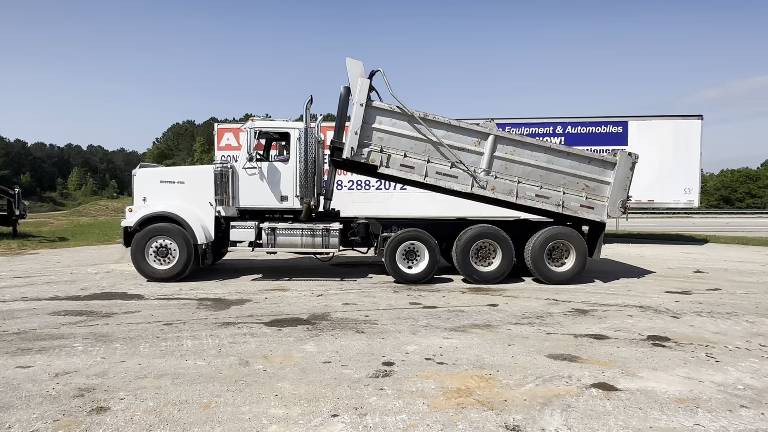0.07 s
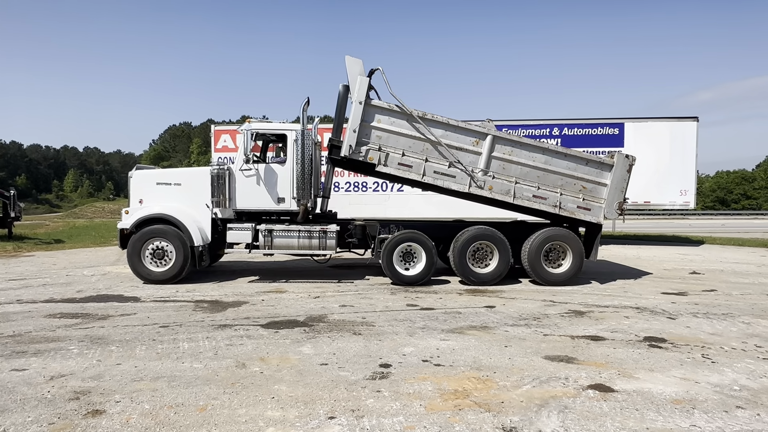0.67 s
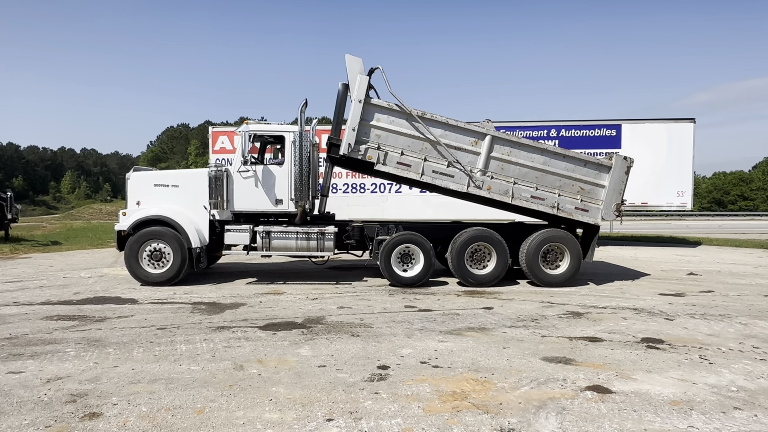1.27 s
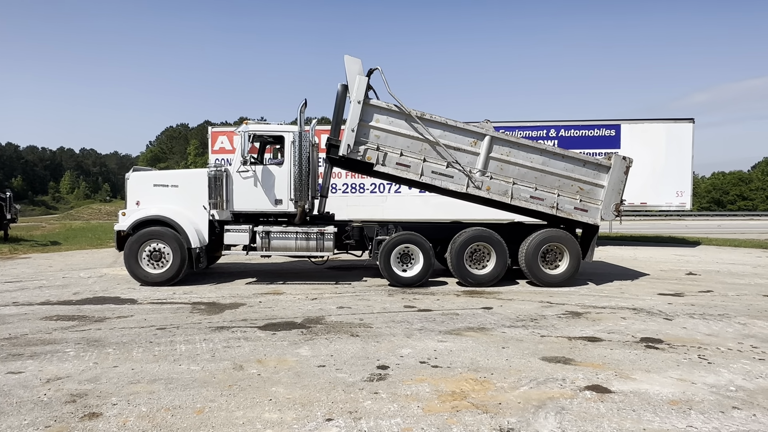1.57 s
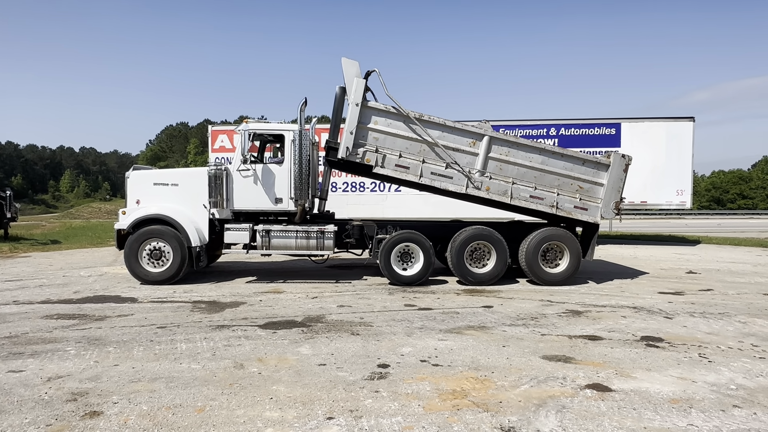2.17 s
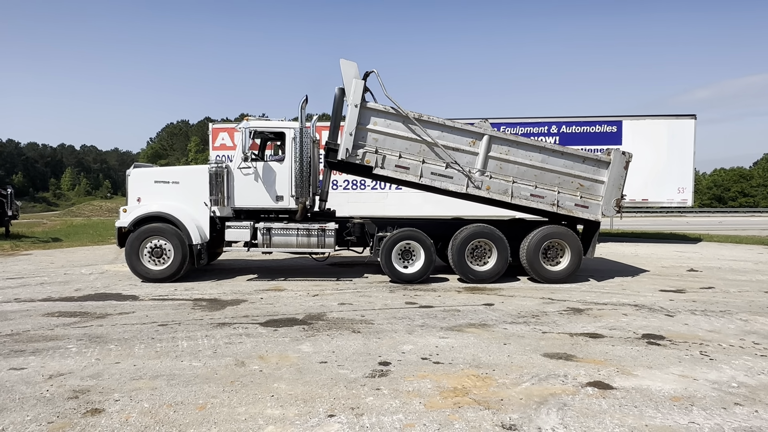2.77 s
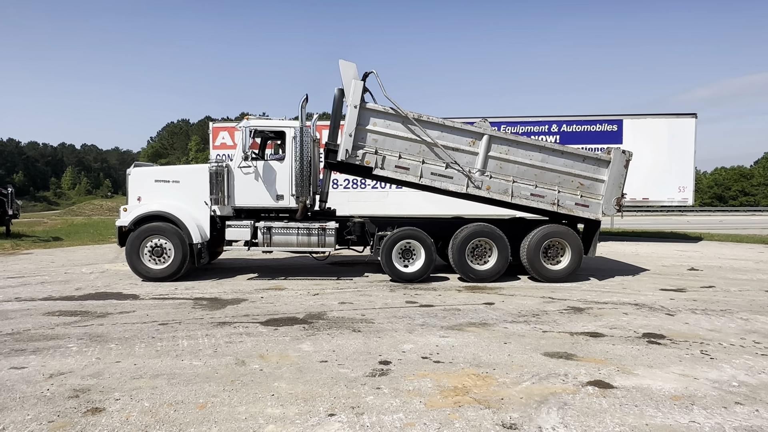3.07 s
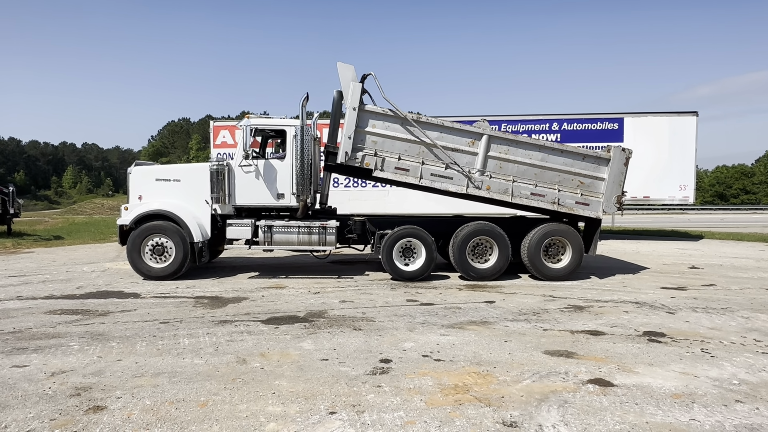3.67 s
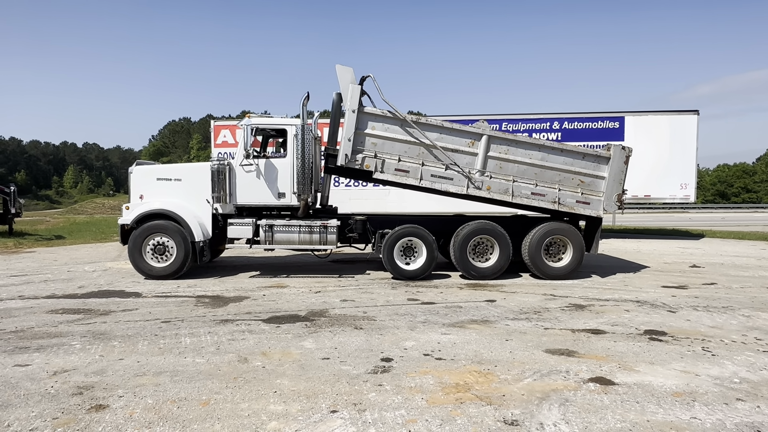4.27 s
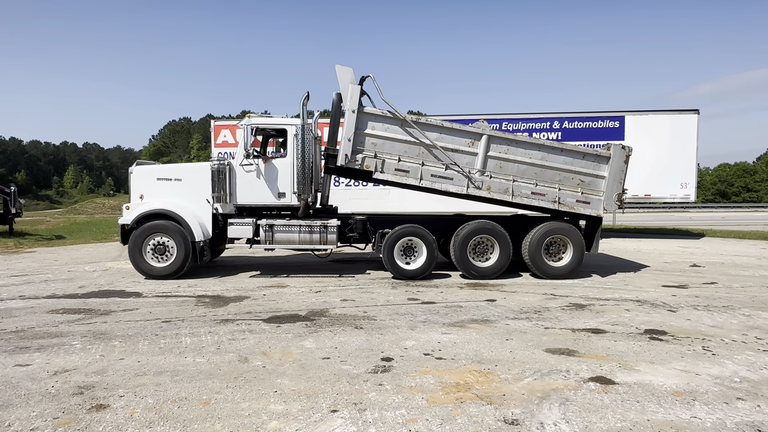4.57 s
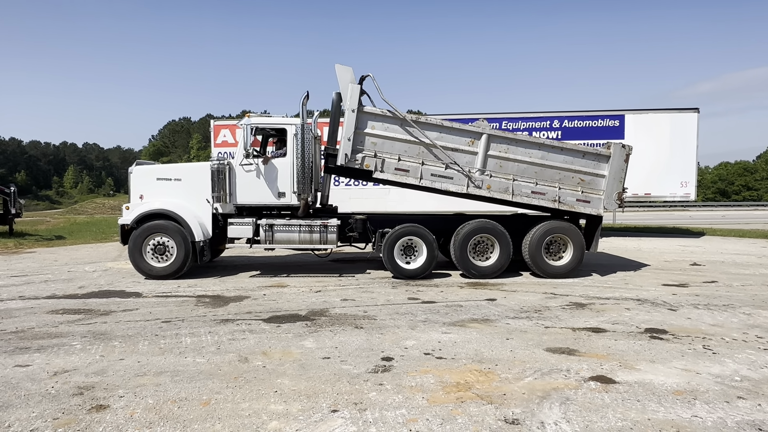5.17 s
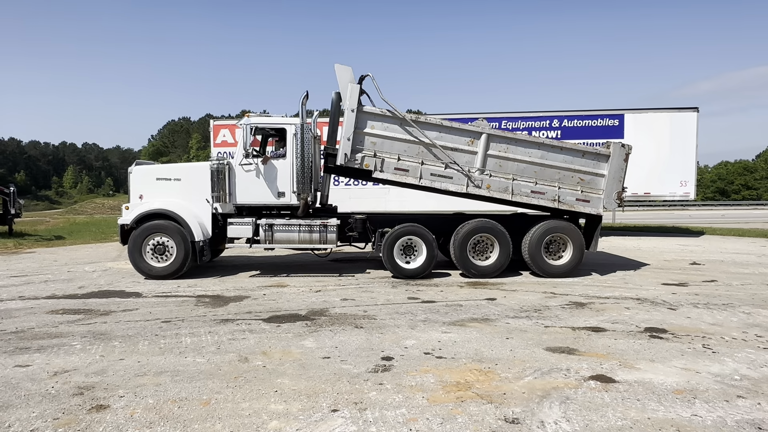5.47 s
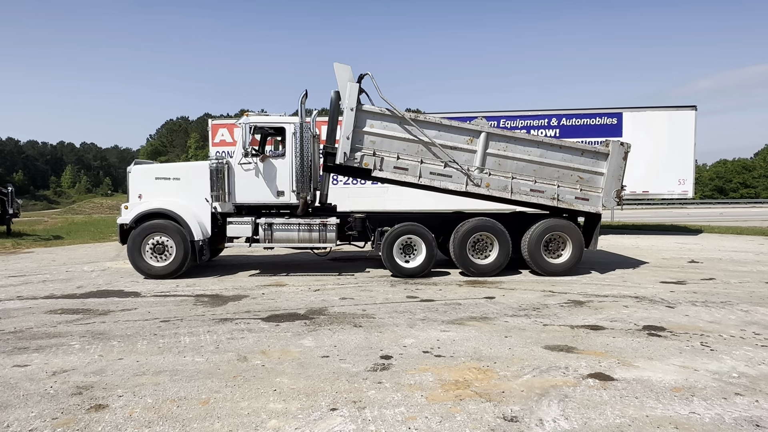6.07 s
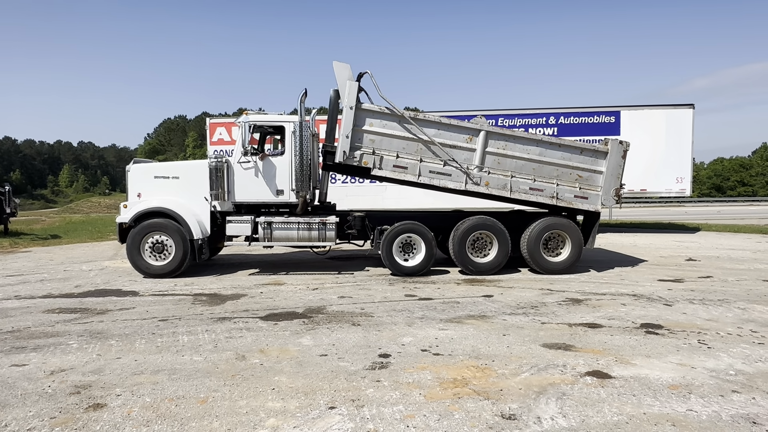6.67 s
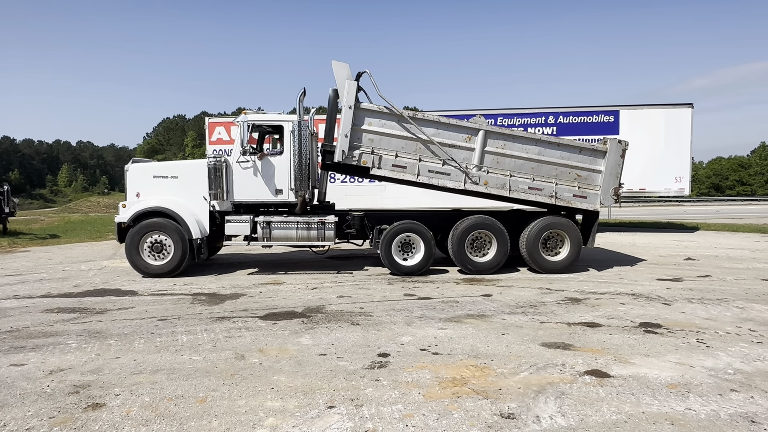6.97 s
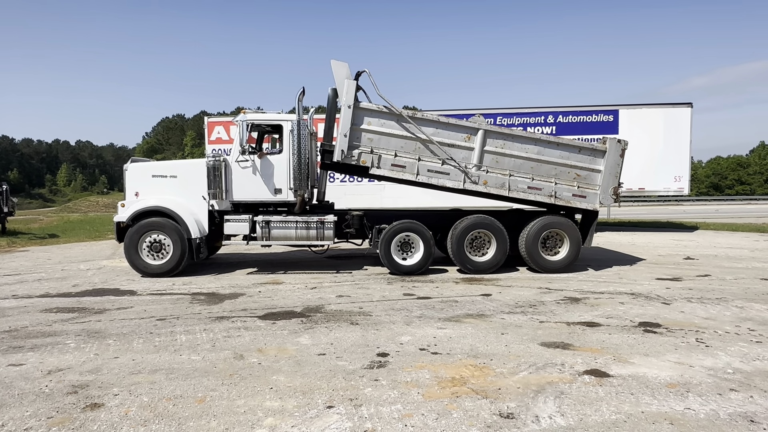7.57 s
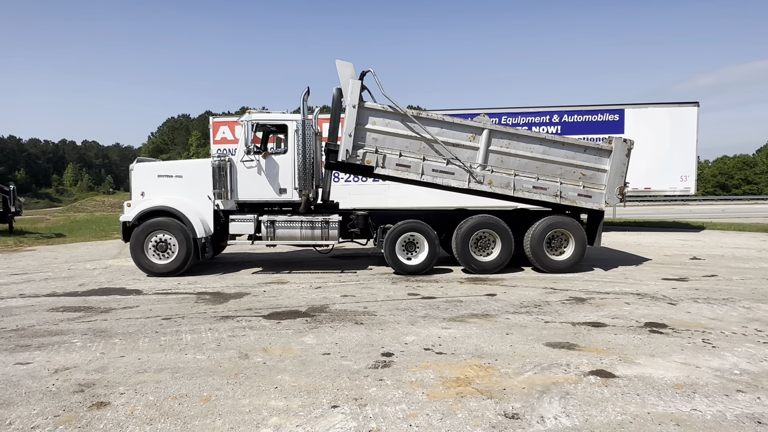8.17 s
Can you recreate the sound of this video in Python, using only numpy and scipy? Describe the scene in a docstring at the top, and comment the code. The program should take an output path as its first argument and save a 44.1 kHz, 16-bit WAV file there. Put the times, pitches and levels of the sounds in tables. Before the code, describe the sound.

A diesel dump truck chugs and clatters in an open gravel lot, about ten metres from a small stereo microphone. The engine sags, revs up again with a whistling turbo, holds, then falls to idle. The brakes scrape, the chassis shudders and the steel body knocks lightly. Near the end, several sharp blasts of brake air hiss out, and a breeze briefly bumps the microphone.

```python
"""An open gravel lot, a small stereo microphone some ten metres from a creeping diesel dump truck.
The six-cylinder engine pulls, sags, is revved again and falls to idle, each firing pulsing the exhaust
and rattling the block, while the turbo whistles up and slowly spins down. The brake linings drag,
the chassis shudders as the truck stops, and blasts of brake air escape. A breeze touches the microphone."""
import sys
import numpy as np
from scipy import signal
from scipy.fft import rfft, irfft
from scipy.io import wavfile
from scipy.ndimage import uniform_filter1d

SR = 44100
rng = np.random.default_rng(int(sys.argv[2]) if len(sys.argv) > 2 else 0)


def digitize_waveform(pressure):
    """Quantize a signal to 16-bit integers and store it at the path in sys.argv[1].

    Rows of a 2-D input are taken as channels; values are limited to [-1, 1].
    """
    field = np.atleast_2d(pressure).T
    bounded = np.clip(field, -1, 1)
    quanta = np.round(bounded * 32767).astype(np.int16)
    wavfile.write(sys.argv[1], SR, quanta)


N = 366912
T = np.arange(N) / SR
HZ = np.fft.rfftfreq(N, 1 / SR)
START_S = .036  # silence until here
WORKING_HZ = 70  # firings a second at working speed
FIRST_ROW = np.array([[1], [0]])  # the truck's two rows are its direct and its scattered sound

# strength offset of each cylinder, in firing order (no unit)
CYLINDER_OFFSETS = [-1.8, -1.3, -2.5, -2.5, -2.7, -2]


def amp(db):
    """Decibels to gain."""
    return 10 ** (np.asarray(db) / 20)


def unit(x):
    """Scales to rms 1."""
    return x / np.sqrt(np.mean(x ** 2) + 1e-20)


def follow(x, points):
    """Reads a two-column table at x, along straight lines."""
    return np.interp(x, *np.transpose(points))


def spectrum(points):
    """Spreads a table over all frequencies, on a log axis."""
    f, value = np.transpose(points)
    return np.interp(np.log(HZ + 1), np.log(f), value)


def colour(x, points):
    """Filters by a spectrum (f/Hz, relative level/dB) that falls away below its first point; rms 1."""
    skirt = 1 / np.sqrt(1 + (.8 * points[0][0] / (HZ + 1)) ** 6)
    return unit(irfft(rfft(x) * amp(spectrum(points)) * skirt, N))


def noise():
    """Two unrelated white noises: the direct and the scattered sound."""
    return rng.standard_normal((2, N))


def wander(rate_hz):
    """Smooth random drift, rms 1."""
    return unit(irfft(rfft(rng.standard_normal(N)) * np.exp(-(HZ / rate_hz) ** 2), N))


def resonate(x, hz, width_hz):
    """A steep resonance that can follow a pitch curve; rms 1."""
    carrier = np.exp(2j * np.pi * np.cumsum(hz * np.ones(N)) / SR)
    pole = np.exp(-np.pi * width_hz / SR)
    return unit((carrier * signal.lfilter([1], [1, -2 * pole, pole * pole], x / carrier)).real)


def sine(turns):
    """A tone of rms 1."""
    return np.sqrt(2) * np.cos(2 * np.pi * turns)


def envelope(start, length, attack_s, fall_db_per_s):
    """Rises, holds until the length is over, then dies away."""
    age = T - start
    return np.clip(age / attack_s, 0, 1) * amp(-fall_db_per_s * np.maximum(age - length, 0))


def swell(peak_s, half_s):
    """A bell-shaped rise and fall."""
    return np.exp(-((T - peak_s) / half_s) ** 2)


def with_speed(speed_hz, db, db_per_octave):
    """Gain of a layer that grows with engine speed; db holds at working speed."""
    return amp(db + db_per_octave * np.log2(speed_hz / WORKING_HZ))


def breeze(lumps_db=2):
    """Short, lumpy gusts rumble on the microphone's left port alone."""
    # gusts: start/s, length/s, level/dB
    gusts = [(6.381, 0.16, -20.5), (6.585, 0.16, -20), (7.535, 0.13, -36), (8.129, 0.073, -29)]
    # wind on the port: f/Hz, relative level/dB
    buffet = [(25, -19), (55, 1), (150, -6), (300, -15.5), (700, -35), (2000, -70)]
    wind = sum(amp(db) * envelope(s, length, attack_s=.017, fall_db_per_s=180) for s, length, db in gusts)
    return FIRST_ROW * wind * colour(noise() * amp(lumps_db * wander(40)), buffet)


def body_buzzes():
    """Bodywork rings briefly as the slowing engine passes through its resonances."""
    # buzzes: peak/s, half length/s, f/Hz, width/Hz, level/dB
    buzzes = [(0.97, .09, 730, 20, -28), (4.32, .13, 705, 15, -34), (4.601, 0.081, 742, 15, -30)]
    return sum(amp(db) * swell(s, half) * resonate(noise(), hz, width) for s, half, hz, width, db in buzzes)


def body_knocks():
    """Short, damped rings of the steel dump body as it settles."""
    # knocks: t/s, level/dB, f/Hz, t60/s
    knocks = [(6.391, -3.5, 84.3, 0.11), (6.474, -12.5, 214.6, 0.06), (6.675, -19, 334, 0.097),
              (7.225, -10, 778, 0.043), (7.402, -10.5, 805, 0.057), (7.552, -9, 249, 0.026)]
    rings = np.zeros(N)
    for s, db, hz, t60 in knocks:
        age = np.maximum(T - s, 0)
        rings += amp(db - 60 * age / t60) * np.sin(2 * np.pi * hz * age) * np.minimum(age * hz, 1)
    return FIRST_ROW * rings


def intake_sighs():
    """Spare boost rushes out of the intake after each lift of the throttle at speed."""
    # sighs: start/s, length/s, level/dB
    sighs = [(0.66, 0.23, -31.5), (4.15, 0.32, -34)]
    # intake hiss: f/Hz, relative level/dB
    intake = [(2300, -21), (2800, 6.5), (3150, -17), (3600, 5), (5200, -17), (9000, -23.5), (14000, -28)]
    flow = sum(amp(db) * envelope(s, length, attack_s=.074, fall_db_per_s=25) for s, length, db in sighs)
    return flow * colour(noise(), intake)


def brakes(engine_shake_db=-36):
    """At each grab the linings scrape in the drums and the chassis, always lightly shaking, shudders."""
    # grabs: start/s, length/s, scrape/dB, shudder/dB
    grabs = [(5.639, 0.2, -24.5, -33), (6.141, 0.27, -30, -30), (6.349, 0.19, -50, -24),
             (6.594, 0.26, -33.5, -27.5), (7.105, 0.34, -25, -51), (7.509, .12, -40, -36)]
    # lining scrape and chassis shudder: f/Hz, relative level/dB
    lining = [(400, -5.5), (600, -9), (780, 5), (1100, -5.5), (1400, -3), (2100, -7.5), (3200, -17),
              (4800, -20), (6500, -26), (11000, -45)]
    chassis = [(20, -36), (45, -9), (70, -0.5), (130, -3), (200, -5.5), (330, -13.5), (500, -25.5),
               (1200, -68)]
    drag, shudder = 0, amp(engine_shake_db)
    for s, length, drag_db, shudder_db in grabs:
        grab = envelope(s, length, attack_s=.041, fall_db_per_s=148)
        drag = np.hypot(drag, amp(drag_db) * grab)
        shudder = np.hypot(shudder, amp(shudder_db) * grab)
    scrape = drag * amp(.18 * wander(35)) * colour(noise(), lining)
    return scrape + shudder * amp(1.1 * wander(45)) * colour(noise(), chassis)


def chassis_echoes(x, echo_db=-18, longest_s=.02, count=8):
    """Early reflections off the frame and the ground ripple the spectrum; rms 1."""
    delays = rng.uniform(0, longest_s, count)
    echoes = amp(echo_db) * sum(np.exp(-2j * np.pi * HZ * delay) for delay in delays)
    return unit(irfft(rfft(x) * (1 + echoes), N))


def brake_air(attack_s=.067, split_hz=8000, squeak_hz=10174):
    """The valve squeaks open, then vents blasts that whistle, sag with the pressure and die away duller."""
    # blasts: start/s, length/s, jet/dB, fall/(dB/s), whistle length/s, whistle/dB, whistle f/Hz
    blasts = [(6.976, 0.14, -18, 61, 0.068, -17, 15560), (7.05, 0.063, -25, 61, 0.057, -14, 15720),
              (7.157, 0.43, -21, 61, 0.15, -21, 15720), (7.678, 0.181, -32.5, 61, 0.019, -50, 15500),
              (7.823, 0.1, -20, 88, 0.031, -24, 15500)]
    # air jet: f/Hz, relative level/dB
    jet_spectrum = [(1500, -8.5), (2300, -11.5), (3100, -5.5), (4200, -3), (5000, -10), (5500, -9),
                    (6600, -8), (8400, -16.5), (10200, -8), (13900, -9.5), (15000, -12.5)]
    # hollow rings inside the blasts: peak/s, level/dB, fade/(dB/s), f/Hz, width/Hz
    hollows = [(7.08, -32, 131, 4300, 699), (7.28, -27.5, 72, 2960, 382), (7.95, -35, 73, 4350, 900)]
    high_flow, low_flow, whistle = 0, 0, 0
    waver, flutter = 1 + .0025 * wander(150), amp(1.5 * wander(60))
    for s, length, jet_db, fall, whistle_s, whistle_db, whistle_hz in blasts:
        pressure = envelope(s, 0, attack_s, fall_db_per_s=28)
        flow = amp(jet_db) * pressure
        high_flow = np.hypot(high_flow, flow * envelope(s, length, attack_s, fall))
        low_flow = np.hypot(low_flow, flow * envelope(s, length, attack_s, .49 * fall))  # lows linger
        edge_tone = flutter * sine(whistle_hz * np.cumsum(waver) / SR)
        catch = envelope(s + .02, whistle_s, attack_s=.043, fall_db_per_s=250)  # just after the opening
        whistle += amp(whistle_db) * pressure * edge_tone * catch
    hiss = amp(.2 * wander(109.4)) * chassis_echoes(colour(noise(), jet_spectrum))
    low_hiss = irfft(rfft(hiss) / (1 + (HZ / split_hz) ** 6), N)
    jet = low_flow * low_hiss + high_flow * (hiss - low_hiss)
    opening = envelope(6.92, .08, attack_s, fall_db_per_s=250)
    squeak = amp(-37.5) * opening * sine(squeak_hz * T + .1 * wander(80))
    rings = sum(amp(db - fade * abs(T - s)) * resonate(noise(), hz, width)
                for s, db, fade, hz, width in hollows)
    return jet + FIRST_ROW * (whistle + squeak) + rings


def timing_gears(firings, speed_hz, teeth_per_firing=16):
    """Meshing teeth whine, and stutter more in their backlash below working speed."""
    # whine by engine speed: firing rate/Hz, level/dB
    whine = [(35, -43.5), (41, -51), (49, -33), (56, -30.5), (64, -37), (74, -30.5)]
    slack = np.clip((WORKING_HZ - speed_hz) / 6, 0, 1)
    backlash = (.07 + .07 * slack) * wander(35)
    stutter_db = (1.6 + 1.8 * slack) * wander(30)
    level = amp(follow(speed_hz, whine) + stutter_db)
    return FIRST_ROW * level * sine(teeth_per_firing * firings + backlash)


def turbo(firings, breath_db=-4, octave_db=-22):
    """The blade whistle smears spooling up, steadies and splits under boost, and wavers spinning down."""
    # blade whistle: t/s, f/Hz, level/dB
    whistle = [(0, 4300, -42), (.58, 4510, -41.5), (0.8, 4490, -34.5), (1.0, 4366, -36), (1.3, 4130, -43.5),
               (1.52, 3956, -36.5), (1.7, 3799, -30.5), (1.9, 3656, -44), (2.06, 3570, -34.5),
               (2.19, 3715, -30), (2.38, 4360, -34), (2.5, 4580, -40), (2.66, 4645, -30.5),
               (2.85, 4640, -38), (3.1, 4720, -36.5), (3.4, 4783, -36), (3.7, 4812, -37),
               (4.05, 4826, -37.5), (4.2, 4795, -33), (4.4, 4725, -37), (4.57, 4626, -38),
               (4.8, 4380, -39.5), (4.95, 4223, -36.5), (5.1, 4030, -43.5), (5.2, 3900, -36),
               (5.4, 3696, -42), (5.55, 3488, -47), (6, 3094, -43.5), (6.4, 2838, -43), (6.9, 2640, -51),
               (7.4, 2460, -49), (8.32, 2228, -43)]
    # exhaust pulses split the whistle: offset/crank rate, relative level/dB
    sidebands = [(-6, -16), (-3, -11), (3, -9), (6, -7), (9, -6), (12, -7.5)]
    times, pitches, levels_db = np.transpose(whistle)
    hz, level = np.interp(T, times, pitches), amp(np.interp(T, times, levels_db))
    boost = envelope(2.62, 1.463, attack_s=.19, fall_db_per_s=91)
    rise_hz_per_s = uniform_filter1d(np.gradient(hz) * SR, 4000)
    spooling = np.clip(rise_hz_per_s / 1800, 0, .97)
    wavering_hz = hz * (1 + (.003 - .0024 * boost) * wander(14) + (.007 - .0055 * boost) * wander(120))
    turns = np.cumsum(wavering_hz) / SR
    blade = (.5 + .55 * boost) * sine(turns) + (.7 - .4 * boost) * resonate(noise(), wavering_hz, 110)
    flutter = amp((2 - .8 * boost) * wander(30) - .5)
    crank_turns = firings / 3
    cluster = sum(amp(db + 2 * wander(11.7)) * sine(turns + offset * crank_turns + rng.random())
                  for offset, db in sidebands)
    breath = amp(breath_db) * resonate(noise(), hz, 200)
    smear = spooling * resonate(noise(), hz, 650)
    octave = amp(octave_db) * resonate(noise(), 2 * hz, 450)
    return level * ((1 - spooling) * flutter * blade + boost * cluster + breath + smear + octave)


def firing_pulse(firings):
    """Jumps to 1 at each firing and decays until the next."""
    return np.exp(-(firings % 1) / .3)


def manifold(firings, speed_hz, surge):
    """Hot gas spits once a firing; in the surge a brighter rush joins and resonances rasp."""
    # rasps: peak/s, half length/s, f/Hz, width/Hz, level/dB
    rasps = [(2.16, .05, 690, 53, -24), (2.153, .07, 3700, 350, -27.5), (2.27, 0.056, 2350, 380, -29),
             (2.303, 0.057, 1420, 110, -20.5)]
    puff = firing_pulse(firings)
    spit = colour(noise() * (1 + .16 * puff),
                  [(5500, 12), (8300, -3.5), (10000, -1), (12000, -6), (14500, -29), (15600, -30)])
    rush = colour(noise() * (.5 + puff), [(4000, 8.5), (8300, -2), (10500, -1), (13500, -8), (15600, -12)])
    rasp = sum(amp(db) * swell(s, half) * resonate(noise() * (.57 + puff), hz, width)
               for s, half, hz, width, db in rasps)
    spit *= with_speed(speed_hz, db=-38, db_per_octave=13.5)
    rush *= surge * with_speed(speed_hz, db=-27, db_per_octave=7.5)
    return spit + rush + rasp


def block_clatter(firings, speed_hz, extra_knock_db, surge):
    """Each firing shakes the block and panels with a burst of rattle; the tone hardens with speed."""
    # engine block under load and at idle: f/Hz, relative level/dB
    loaded = [(265, -.5), (310, -8.5), (360, -3), (435, -4.5), (500, -11), (560, -4.5), (720, -2),
              (880, -1.5), (1070, -11), (1400, -1.5), (1700, -12), (2100, -7.5), (2600, -18), (3500, -12),
              (4300, -20), (5600, -46), (7000, -43)]
    idling = [(280, -2.5), (350, -1), (490, -7.5), (600, 1), (760, 3.5), (930, -2), (1100, -4),
              (1400, -0.5), (2200, -12), (3500, -12), (5000, -23.5), (7000, -43)]
    # ringing panels: f/Hz, width/Hz, level/dB
    panels = [(265.2, 25, -46), (430.6, 22, -49), (551, 25, -47.5), (707.5, 32, -45.5), (933.5, 26, -45)]
    force = 1 + .25 * np.array(CYLINDER_OFFSETS)[firings.astype(int) % len(CYLINDER_OFFSETS)]
    bursts = noise() * (1 + .85 * force * firing_pulse(firings)) * amp(.7 * wander(30))
    fast = np.clip((speed_hz - 38) / 30, 0, 1)
    block = fast * amp(9.5) * colour(bursts, loaded) + (1 - fast) * amp(10) * colour(bursts, idling)
    ringing = sum(amp(db) * resonate(bursts, hz, width) for hz, width, db in panels)
    knock = with_speed(speed_hz, db=-32 + extra_knock_db, db_per_octave=8.5)
    return np.hypot(knock, amp(-32) * surge) * block + ringing


def chugging(firings, speed_hz, flow, base_db=-27):
    """Unequal cylinders add chugging tones, which boom as they cross the stack's resonances."""
    # tones: multiple of the six-firing cycle, low-speed level/dB, working-speed level/dB
    tones = [(9, -13, -5), (14, -11, -1.5), (15, -11, -6.5), (16, -13, 4.5), (20, -7.5, -19), (21, -1, 0),
             (22, -6, -1), (24, -10, -7), (26, -7.5, -12)]
    # stack resonances: f/Hz, gain/dB
    boom = [(100, -3), (120, -5), (129, .5), (140, -3.5), (158, 0.5), (177, 1.5), (188, -3), (198, -5.5),
            (206, -11), (240, -17)]
    swaying = firings + .013 * wander(8)
    fast = np.clip((speed_hz - 60) / 10, 0, 1)
    chug = 0
    for multiple, slow_db, fast_db in tones:
        order = multiple / len(CYLINDER_OFFSETS)
        tone_db = base_db + slow_db + fast * (fast_db - slow_db) + 1.7 * wander(14)
        chug += amp(tone_db + follow(order * speed_hz, boom)) * sine(order * swaying + rng.random())
    return flow * chug


def exhaust(firings, speed_hz, pull, surge):
    """One pressure pulse a firing makes the note, stronger under load, over chugging and gas rumble."""
    # gas flow in the stack: firing rate/Hz, level/dB
    flow_by_speed = [(34.7, -16.5), (38, -6.5), (46, -0.5), (56, 2.5), (66, 3), (71, 0), (74, -0.5)]
    # firing harmonics 1 to 3: coasting level/dB, load's share/dB
    harmonics = [(-6, 0), (4, 0), (2.5, -3)]
    # how the pipe passes the harmonics: f/Hz, gain/dB
    pipe = [(36, -20), (53, 2.5), (72, 2.5), (107, -1.5), (126, -21), (140, -3.5), (149, -7.5), (163, 4),
            (177, 2.5), (210, -16.5), (225, -15)]
    # rumble of the stack: f/Hz, relative level/dB
    stack = [(28, -27), (48, -1.5), (85, 0), (115, 1.5), (145, -.5), (182, -1.5), (220, -4), (270, -1),
             (320, -15), (500, -14), (1200, -76)]
    flow = amp(follow(speed_hz, flow_by_speed))
    note = 0
    for k, (coast_db, load_db) in enumerate(harmonics, 1):
        strength = np.hypot(amp(coast_db) * np.sqrt(flow), amp(load_db) * pull)
        note += strength * amp(follow(k * speed_hz, pipe)) * sine(k * firings)
    note *= with_speed(speed_hz, db=-28.5, db_per_octave=11)
    chug = chugging(firings, speed_hz, flow)
    rumble = np.hypot(amp(-25.5) * flow, amp(-22.5) * surge) * colour(noise(), stack)
    return FIRST_ROW * (note + chug) + rumble


def engine_load(sag_db_per_s=2.5):
    """Each pull takes hold, eases off and is released; gives the exhaust's load gain and extra knock/dB."""
    # pulls: start/s, length/s, exhaust note/dB, extra knock/dB
    pulls = [(-.2, 0.87, 13.5, 2.5), (0.949, 0.55, 10.5, 1.5), (1.988, 0.43, 16, 2),
             (2.347, 1.777, 13.5, 1), (5.149, 1.74, 11.5, -3.5)]
    pull, knock_db = 0, 0
    for s, length, note_db, extra_db in pulls:
        effort = envelope(s, length, attack_s=.077, fall_db_per_s=148) * amp(-sag_db_per_s * (T - s))
        pull = np.maximum(pull, amp(note_db) * effort)
        knock_db = np.maximum(knock_db, extra_db * effort)
    return pull, knock_db


def engine():
    """The diesel's layers share one running count of firings; the throttle is floored once."""
    # engine speed: t/s, firing rate/Hz
    speed = [(0, 70.32), (0.64, 70.4), (.95, 58.8), (1.16, 53.2), (1.45, 53.85), (1.751, 45.84),
             (2.05, 39.2), (2.4, 69.9), (2.55, 74.4), (2.82, 74.65), (3.2, 73.62), (4.12, 73.1),
             (4.55, 58.34), (5, 44.88), (5.251, 39.2), (6.2, 36.73), (6.8, 35.78), (7.15, 34.8)]
    speed_hz = follow(T, speed)
    pull, knock_db = engine_load()
    surge = envelope(2.05, .29, attack_s=.068, fall_db_per_s=78)
    firings = np.cumsum(speed_hz * (1 + .0022 * wander(20))) / SR
    return (exhaust(firings, speed_hz, pull, surge) + block_clatter(firings, speed_hz, knock_db, surge)
            + manifold(firings, speed_hz, surge) + timing_gears(firings, speed_hz) + turbo(firings))


def stereo_image(truck):
    """The left leads below 8 kHz, widened by scattered sound; above, the channels run in step, nearly mono."""
    # stereo width, widest at 2 to 4 kHz: f/Hz, left-right coherence (0 to 1)
    coherences = [(60, .98), (250, .91), (500, .89), (1000, .72), (2000, .48), (4000, .52), (8000, .8),
                  (13000, .92)]
    # balance: f/Hz, left minus right/dB
    tilt = [(60, .7), (250, 1.3), (450, 3), (700, 3.6), (1100, 0), (2200, -.3), (4500, 2), (8000, .6),
            (12000, 0)]
    # phase between the channels, about three whole turns (in phase) at 10 to 14 kHz: f/Hz, phase/rad
    phases = [(0, 0), (70, .27), (140, .42), (280, .9), (650, 1), (1030, 1.8), (1550, 3.4), (3000, 7.3),
              (4400, 10.8), (7700, 19.6), (10400, 18.9), (14000, 18.9), (15600, 16.7)]
    direct, scattered = rfft(truck)
    coherence = np.clip(spectrum(coherences), 0, 1)
    shared = direct * np.sqrt((1 + coherence) / 2)
    apart = scattered * np.sqrt((1 - coherence) / 2)
    lean = amp(spectrum(tilt) / 2) * np.exp(.5j * follow(HZ, phases))
    return irfft(np.array([(shared + apart) * lean, (shared - apart) / lean]), N)


def scene():
    """The truck at ten metres, the breeze right at the microphone."""
    truck = engine() + body_buzzes() + brakes() + body_knocks() + brake_air() + intake_sighs()
    return stereo_image(truck * (T > START_S)) + breeze()


def record(dry, ceiling=.95, edge_hz=15920):
    """The microphone notches the treble and rounds off the highest peaks; then the band is limited."""
    # microphone notches: f/Hz, width/Hz, gain/dB
    notches = [(5260, 140, -7), (7470, 264, -28)]
    response = amp(sum(db / (1 + ((HZ - hz) / width * 2) ** 2) for hz, width, db in notches))
    heard = irfft(rfft(dry) * response, N) * (T > START_S)
    rounded = heard / (1 + (heard / ceiling) ** 8) ** (1 / 8)
    lowpass = signal.firwin(511, edge_hz, window=("kaiser", 9), fs=SR)
    return signal.oaconvolve(rounded, lowpass[None], "same")


dry = scene()
out = record(dry)
digitize_waveform(out)
```